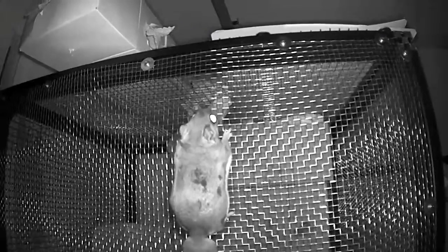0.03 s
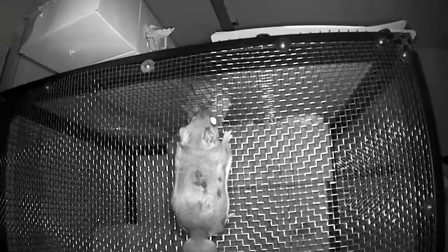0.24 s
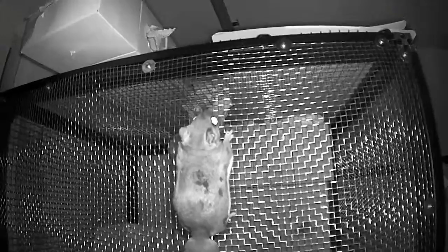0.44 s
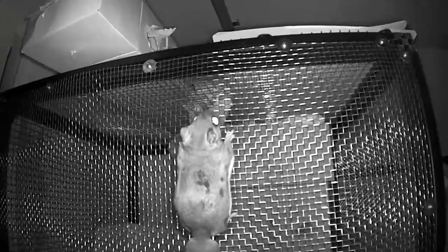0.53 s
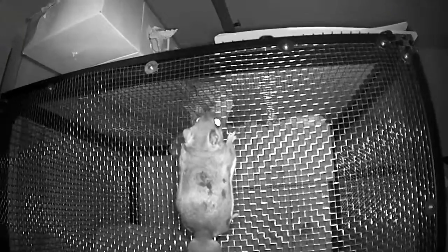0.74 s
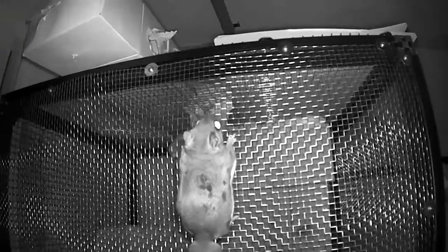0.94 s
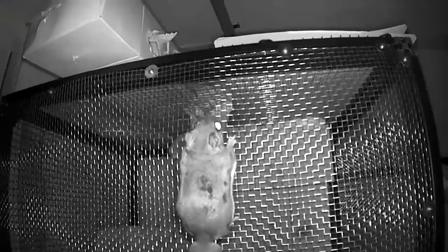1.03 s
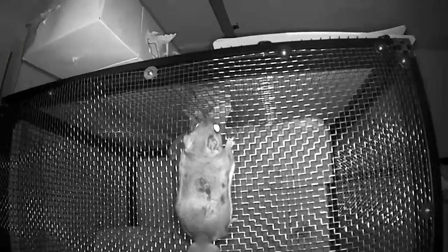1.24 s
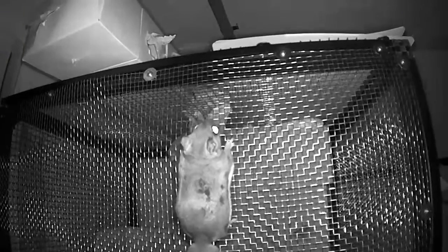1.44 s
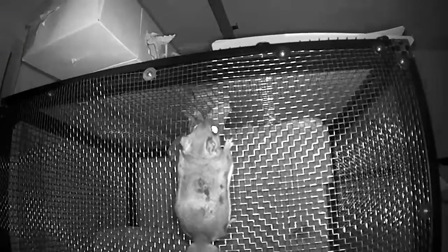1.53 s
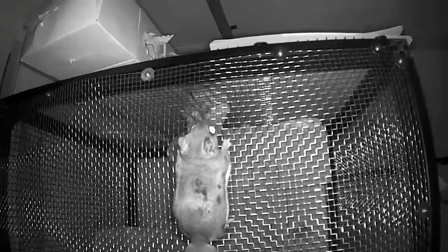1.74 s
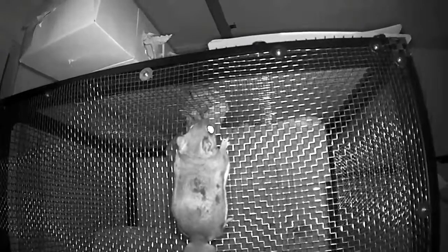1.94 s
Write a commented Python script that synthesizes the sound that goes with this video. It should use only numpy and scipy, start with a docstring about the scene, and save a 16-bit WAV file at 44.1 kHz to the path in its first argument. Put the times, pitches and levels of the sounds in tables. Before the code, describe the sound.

Two bright, very brief squirrel chirps, each led in by airy wheezing and a rough falling whistle, heard close in a quiet room; weaker distant calls follow, while a cheap camera microphone adds hiss, thin whine and soft fast ticking.

```python
"""Over steady hiss come faint peeps and a wheezy intake, with low pulses about 15 times a second.
A flying squirrel on its wire cage is calling close to a small camera in a quiet room: each call is shaped
breath noise, a rough whistle with a rattle of random clicks, then a gliding near-sine chirp from about
7 to 14 kHz. Fainter calls answer from afar through a longer reverberation. The camera samples at 16 kHz,
so the chirp folds down above 8 kHz; its electronics add enveloped tone pulses, ticks and a thin whine."""
import sys
import numpy as np
from scipy import signal
from scipy.fft import rfft, irfft, next_fast_len
from scipy.io import wavfile

SR = 44100
rng = np.random.default_rng(int(sys.argv[2]) if len(sys.argv) > 2 else 0)


def to_wav(s):
    """Save 16-bit WAV."""
    ch = np.atleast_2d(s).T  # columns
    pcm = np.round(np.clip(ch, -1, 1) * 32767)  # PCM
    wavfile.write(sys.argv[1], SR, pcm.astype(np.int16))


def magnitude_from_level(level_db):
    """Linear magnitude for a level in decibels (20 dB per decade)."""
    exponent = np.asarray(level_db, float) / 20
    return 10 ** exponent


N = 85995
T = np.arange(N) / SR  # time in s

# Pitch glide of the two near chirps, one list each: t/s, f/Hz
CHIRP_PITCH = [
    [(.2035, 6500), (.206, 7300), (.209, 7730), (.222, 7810), (.229, 7900), (.233, 8000), (.238, 8220),
     (.243, 8900), (.247, 10000), (.25, 11300), (.257, 12150), (.263, 13300), (.267, 13850), (.2695, 13930)],
    [(1.292, 7500), (1.297, 7720), (1.301, 7880), (1.304, 8020), (1.308, 8500), (1.312, 9700),
     (1.315, 11300), (1.321, 12150), (1.329, 13300), (1.334, 13850), (1.3375, 13930)],
]


def rms_one(x):
    """Normalisation by mean power: scales a signal to rms 1."""
    return x / np.sqrt(np.mean(x ** 2) + 1e-20)


def coloured(x, points):
    """Zero-phase linear filtering: multiplies the spectrum by a gain drawn through f/Hz, level/dB points."""
    size = next_fast_len(x.shape[-1] + 4096)
    hz, db = np.transpose(points)
    bin_hz = np.arange(size // 2 + 1) * SR / size
    gain = magnitude_from_level(np.interp(np.log(bin_hz + 1), np.log(hz), db))
    return irfft(rfft(x, size) * gain, size)[..., :x.shape[-1]]


def drift(rate):
    """Low-pass random fluctuation: white noise through a double pole at rate Hz, rms 1."""
    r = np.exp(-2 * np.pi * rate / SR)
    slow = signal.lfilter([1], [1, -2 * r, r * r], rng.standard_normal(N + SR))
    return rms_one(slow[SR:])  # the first second lets the filter settle


def tones(x, table):
    """Parallel resonance: a sum of two-pole band-passes with rows f/Hz, width/Hz, level/dB."""
    out = 0
    for hz, width, db in table:
        r = np.exp(-np.pi * width / SR)
        poles = [2, -4 * r * np.cos(2 * np.pi * hz / SR), 2 * r * r]
        out = out + magnitude_from_level(db) * signal.lfilter([1 - r * r, 0, r * r - 1], poles, x + 1e-18)
    return out


def hump(start, length, peak_share):
    """Raised-cosine envelope: rises smoothly to 1 at peak_share of its length, then falls."""
    ramp = np.interp(T, [start, start + peak_share * length, start + length], [0, 1, 0])
    return np.sin(np.pi / 2 * ramp) ** 2


def sine(hz, rough):
    """Amplitude and frequency modulation: a sine of nominal rms 1 whose level and pitch tremble."""
    level = np.sqrt(2) * (1 + rough * drift(380))
    pitch = hz * (1 + 0.013 * rough * drift(170))
    return level * np.sin(2 * np.pi * np.cumsum(pitch) / SR)


def room(x, t60, gap_s):
    """Reverberation as convolution: an exponentially decaying noise tail and one wall echo, coloured."""
    # Colour of the reflected sound: f/Hz, level/dB
    room_colour = [(1000, -9.5), (4300, -6.5), (5600, -8.5), (7400, -10.5), (8600, -4), (10300, -5),
                   (11700, -4), (12800, 2.5), (13850, -7)]
    t = T[:SR // 2]
    fade_in = np.clip(t / gap_s, 0, 1)
    tail = rng.standard_normal(len(t)) * magnitude_from_level(-60 * t / t60) * fade_in
    tail *= magnitude_from_level(-0.5) / np.sqrt(np.sum(tail ** 2))
    tail[int(.016 * SR)] += magnitude_from_level(-15)  # the wall echo, after 16 ms
    return coloured(signal.fftconvolve(x, tail)[:N], room_colour)


def hiss():
    """Stationary noise: Gaussian samples shaped by a spectral density."""
    # Relative density of the hiss: f/Hz, level/dB per Hz
    hiss_colour = [(12, -22), (22, 9), (65, -4.5), (228, -17), (560, -21.5), (800, -18), (1050, -26),
                   (2020, -23), (2450, -22.5), (2800, -26), (7400, -25), (8000, -25), (8300, -78.5),
                   (20000, -120)]
    return magnitude_from_level(-56.5) * rms_one(coloured(rng.standard_normal(N), hiss_colour))


def whine():
    """Narrow-band noise: two resonances in cascade leave a thin line with a flickering level."""
    line = [(2463, 30, 0)]  # f/Hz, width/Hz, level/dB
    flicker_db = 2.5 * drift(36)
    thin_line = rms_one(tones(tones(rng.standard_normal(N), line), line))
    return magnitude_from_level(-71 + flicker_db) * thin_line


def ticks():
    """Impulse response: low-passed single-sample clicks ring a pair of resonances."""
    # Small ticks between the pulses: t/s, level/dB (nominal)
    tick_times = [(0.5834, -48.5), (0.636, -44.5), (0.6989, -47), (0.7573, -49.5), (0.8838, -46.5),
                  (0.9549, -44.5), (1.475, -49), (1.6204, -64)]
    # Their ringing: f/Hz, width/Hz, level/dB
    tick_tones = [(806, 103, 9), (2350, 167, 6.5)]
    clicks = np.zeros(N)
    for s, db in tick_times:
        clicks[int(s * SR)] = magnitude_from_level(db + 25)  # offsets the loss in the filters
    low_pass = signal.butter(2, 3000, fs=SR, output="sos")
    return tones(signal.sosfilt(low_pass, clicks), tick_tones)


def pulses():
    """Gated oscillation: short enveloped sines of random phase, each with resonant noise as fizz."""
    # Low electronic pulses: t/s, level/dB, f/Hz, length/s (nominal; the envelope opens 2 ms early)
    pulse_rows = [(0.046, -51.5, 755, 0.017), (0.118, -46.5, 840, 0.015), (0.179, -50, 795, 0.016),
                  (0.25, -49, 806, 0.013), (0.313, -46, 750, 0.0095), (0.382, -49.5, 856, 0.017),
                  (0.44, -45.5, 785, 0.012), (0.51, -43.5, 808, 0.01), (0.574, -47, 855, 0.011),
                  (0.643, -47.5, 747, 0.018), (0.707, -48, 796, 0.0089), (0.714, -47, 812, 0.013),
                  (0.778, -45.5, 780, 0.0074), (0.782, -48.5, 800, 0.012), (0.84, -45.5, 832, 0.019),
                  (0.914, -46.5, 801, 0.011), (0.98, -46, 828, 0.018), (1.048, -44.5, 842, 0.015),
                  (1.059, -49, 840, 0.025), (1.079, -49, 677, 0.013), (1.109, -45, 820, 0.013),
                  (1.182, -46.5, 836, 0.0073), (1.235, -56, 780, 0.019), (1.274, -54.5, 732, 0.0081),
                  (1.315, -45, 815, 0.016), (1.379, -45.5, 800, 0.013), (1.447, -49, 806, 0.0093),
                  (1.502, -48, 740, 0.016), (1.513, -58.5, 778, 0.02), (1.578, -45.5, 814, 0.015),
                  (1.644, -49.5, 814, 0.011), (1.713, -46, 833, 0.01), (1.718, -50, 750, 0.014),
                  (1.778, -47, 810, 0.0077), (1.787, -46, 806, 0.0062), (1.847, -47, 788, 0.015),
                  (1.911, -51, 670, 0.011), (1.914, -51, 836, 0.013)]
    # Resonances of the fizz: f/Hz, width/Hz, level/dB
    fizz_tones = [(2470, 100, 7.5), (3290, 310, -3)]
    fizz = magnitude_from_level(-11) * rms_one(tones(rng.standard_normal(N), fizz_tones))
    tremble = 1 + .22 * drift(150)
    phases = rng.uniform(0, 2 * np.pi, len(pulse_rows))
    out = np.zeros(N)
    for (s, db, hz, length), phase in zip(pulse_rows, phases):
        tone = tremble * np.sin(2 * np.pi * hz * (T - s) + phase)
        out += magnitude_from_level(db) * hump(s - .002, length + 0.001, .35) * (tone + fizz)
    return out


def peeps():
    """Steady-pitch tones: short near-sines under smooth envelopes."""
    # Faint short peeps from afar: t/s, length/s, f/Hz, level/dB
    peep_rows = [(.011, .01, 7200, -52), (.025, .007, 3900, -54), (.597, .03, 7850, -60),
                 (1.568, .022, 7850, -60)]
    return sum(magnitude_from_level(db) * hump(s, length, .3) * sine(np.full(N, hz), .4)
               for s, length, hz, db in peep_rows)


def far_chirps():
    """Reverberant field: weaker copies of the second chirp's shape, heard only through the room."""
    # Answering chirps: t/s, level/dB (gain on the near chirp's shape)
    far_rows = [(0.817, -26.5), (1.776, -28.5)]
    # Colour of the distant calls: f/Hz, level/dB
    far_colour = [(7400, -14.5), (8600, 10), (9300, -0.5), (10500, -20), (11750, 16), (12600, 2),
                  (13850, 6)]
    second_start = CHIRP_PITCH[1][0][0]
    far = sum(magnitude_from_level(db) * chirp(count=1, shift_s=s - second_start) for s, db in far_rows)
    return room(coloured(far, far_colour), t60=.35, gap_s=0.011)


def wheeze():
    """Turbulent breath noise: Gaussian noise under a spectral colour and a level contour."""
    # Level contours of the two intakes, one list each: t/s, level/dB
    intakes = [
        [(0.0, -73), (0.012, -53.5), (0.11, -55.5), (0.184, -46.5), (0.208, -37.5), (0.215, -51.5)],
        [(1.04, -97), (1.058, -51.5), (1.194, -52), (1.244, -41), (1.256, -55), (1.262, -39.5), (1.276, -56),
         (1.288, -78.5), (1.29, -49)],
    ]
    # Relative density of the breath: f/Hz, level/dB per Hz
    breath_colour = [(700, -52), (1300, -23), (2150, -10), (2800, -17), (3700, -15), (5500, -8.5),
                     (6100, -4.5), (6600, -1.5), (6950, -1), (7300, 0.5), (8000, -2), (8400, -39),
                     (17600, -120)]
    contour = sum(magnitude_from_level(np.interp(T, *np.transpose(rows), left=-120, right=-120)) for rows in intakes)
    air = rms_one(coloured(rng.standard_normal(N), breath_colour))
    return contour * magnitude_from_level(1.5 * drift(74)) * air


def rattle():
    """Random pulse train: uneven clicks in the throat decay exponentially and gate noise into puffs."""
    # Spells of rattle: start t/s, end t/s, level/dB
    spells = [(0.131, 0.233, -57), (1.197, 1.271, -56.5)]
    # Relative colour of the rattle: f/Hz, level/dB per Hz
    throat_colour = [(80, -8.5), (200, 5.5), (1000, 2), (2500, -10), (4000, -4.5), (8000, -12.5)]
    clicks_per_s = 1100  # on average
    sizes_db = 2.5 * np.minimum(rng.exponential(1, N), 3)
    clicks = (rng.random(N) < clicks_per_s / SR) * magnitude_from_level(sizes_db)
    puffs = signal.lfilter([1], [1, -.97], clicks) * rng.standard_normal(N)
    envelope = sum(magnitude_from_level(db) * hump(a, b - a, .6) ** .5 for a, b, db in spells)
    return rms_one(coloured(puffs, throat_colour)) * envelope


def whistles():
    """Frequency glide with amplitude modulation: rough near-sines sag evenly in pitch and throb."""
    # Rough whistles before a chirp: t/s, length/s, start f/Hz, end f/Hz, level/dB
    whistle_rows = [(.154, .048, 5350, 4550, -41), (.778, .055, 4800, 4720, -62),
                    (1.21, .046, 5150, 4580, -39), (1.728, .035, 4800, 4750, -67)]
    throb = magnitude_from_level(3.0 * drift(50))
    out = np.zeros(N)
    for s, length, start, end, db in whistle_rows:
        pitch = np.interp(T, [s, s + length], [start, end])
        out += magnitude_from_level(db) * hump(s, length, .62) ** .5 * sine(pitch, .55)
    return throb * out


def chirp(count, shift_s):
    """Linear filtering: a gliding near-sine coloured by resonances of the microphone and its case, with a cage echo."""
    # Level contours of the two near chirps, one list each: t/s, level/dB
    chirp_levels = [
        [(.203, -35.5), (.209, -27), (.222, -18), (.229, -30), (.233, -19), (.24, -18.5), (.245, -28.5),
         (.253, -32), (.264, -32), (.271, -48)],
        [(1.292, -70), (1.297, -23.5), (1.3, -23.5), (1.305, -16), (1.311, -22), (1.318, -31), (1.333, -32.5),
         (1.339, -29.5)],
    ]
    # Resonances of the microphone and its case: f/Hz, level/dB
    microphone_colour = [(6500, 0), (8900, 0), (10300, -11), (11200, -3), (11900, 0), (12400, -15),
                         (13200, -20), (13850, -5), (14500, -14)]
    s, hz = np.transpose(CHIRP_PITCH[count])
    t = T - shift_s
    edge = np.interp(t, [s[0] - .001, s[0], s[-1], s[-1] + 0.00067], [0, 1, 1, 0])
    contour = magnitude_from_level(np.interp(t, *np.transpose(chirp_levels[count])))
    source = edge * contour * sine(np.interp(t, s, hz), rough=.1)
    direct = coloured(source, microphone_colour)
    cage_echo = magnitude_from_level(-6) * np.interp(T - .0025, T, direct)  # 2.5 ms later
    return direct + cage_echo


def scene():
    """Superposition: direct and reverberant sound add up, nearly mono, with a faint uneven side signal."""
    # Colour of the faint side signal: f/Hz, level/dB
    side_colour = [(30, -10.5), (130, -1), (1200, -3), (3000, -2), (6000, -3)]
    background = hiss() + whine() + ticks() + pulses()
    near = peeps() + wheeze() + rattle() + whistles() + chirp(count=0, shift_s=0) + chirp(count=1, shift_s=0)
    mid = background + far_chirps() + near + room(near, t60=0.14, gap_s=0.012)
    side = magnitude_from_level(-33.5) * coloured(mid * drift(30), side_colour)
    return mid + side * np.array([[1], [-1]])


def top_cut(x):
    """Nothing passes above the cut-off."""
    return signal.sosfilt(signal.butter(12, 9490, fs=SR, output="sos"), x)


def record(dry):
    """Aliasing: sampling at 16 kHz mirrors the sound about 8 kHz; a soft filter passes the mirror's edge."""
    # Resampling filter: f/Hz, level/dB
    resampling_edge = [(7700, -2.5), (8000, -3.5), (8200, -30.5), (8500, -58.5), (9200, -85), (12000, -97)]
    sampling_hz = 16000
    mirrored = dry * (1 + 2 * np.cos(2 * np.pi * sampling_hz * T))
    finished = coloured(mirrored, resampling_edge)
    return top_cut(finished)


dry = scene()
out = record(dry)
to_wav(out)
```